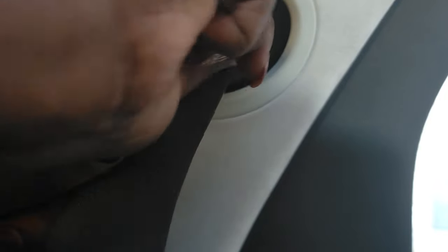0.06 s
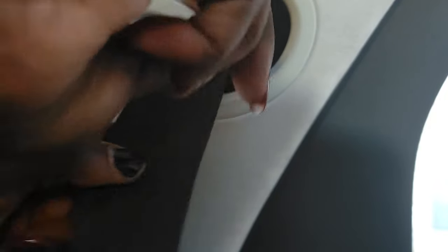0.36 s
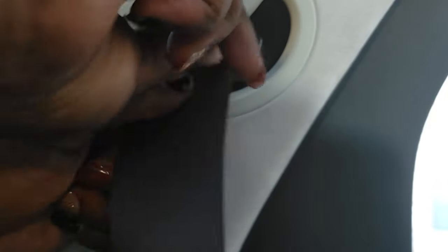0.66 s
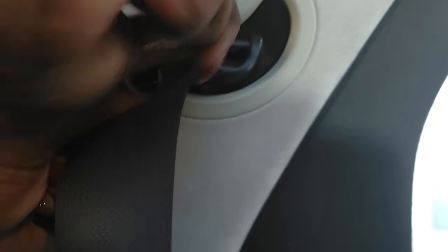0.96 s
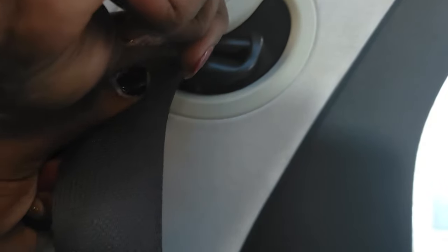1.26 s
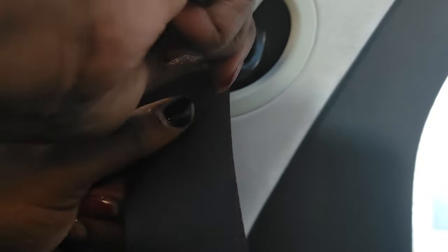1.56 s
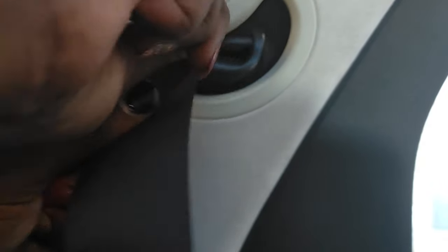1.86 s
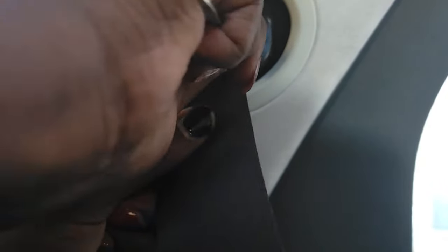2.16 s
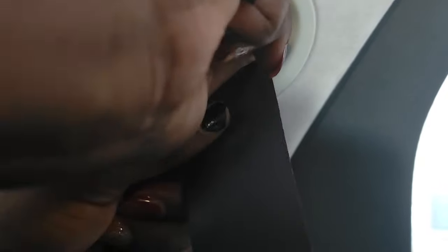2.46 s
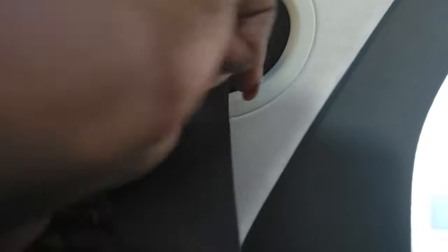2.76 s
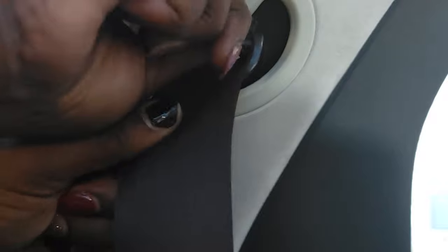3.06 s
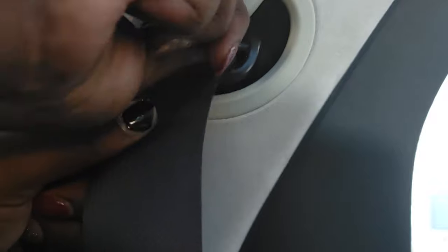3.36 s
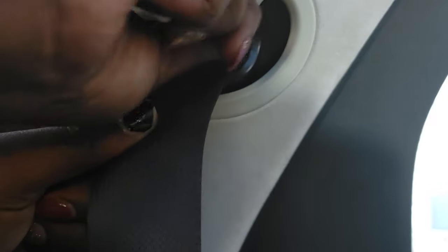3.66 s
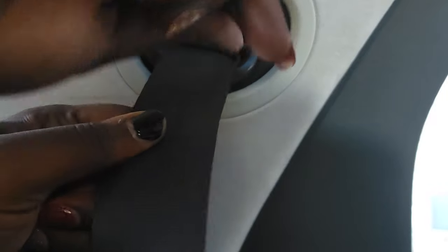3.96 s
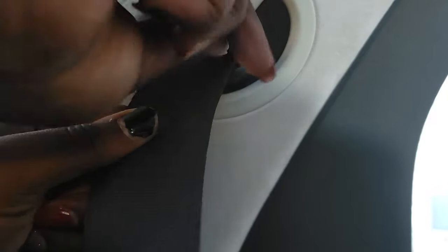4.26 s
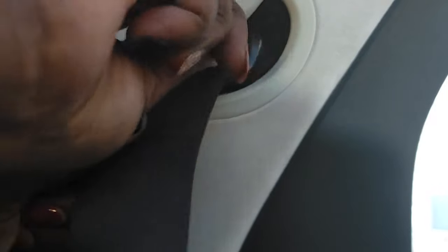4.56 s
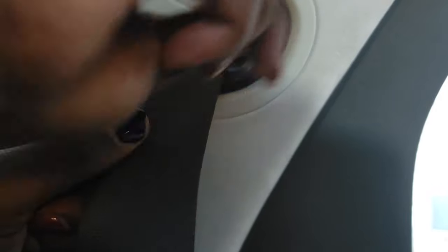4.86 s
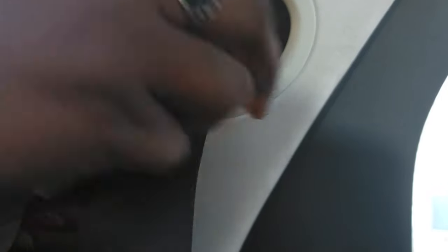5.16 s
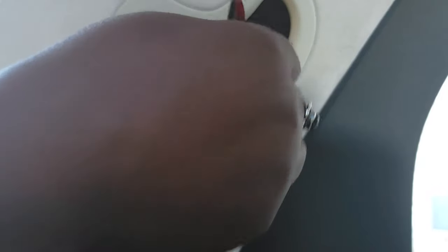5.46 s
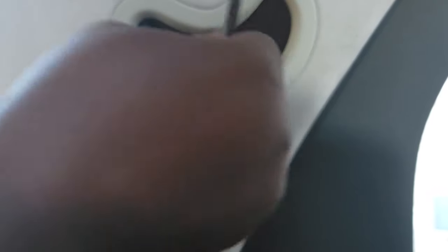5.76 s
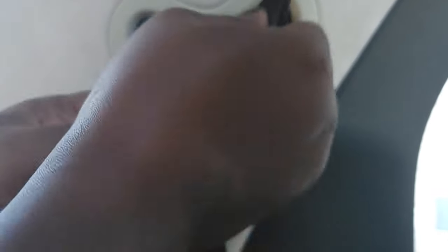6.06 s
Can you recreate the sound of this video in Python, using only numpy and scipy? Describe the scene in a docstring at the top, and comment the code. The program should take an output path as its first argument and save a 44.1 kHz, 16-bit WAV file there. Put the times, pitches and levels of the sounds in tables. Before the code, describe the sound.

Irregular clicks and hollow plastic knocks, each with a soft thump from the door pillar, sound close up as a seatbelt is tugged through its guide. The opening double knock is strongest; others follow singly or in pairs among faint finger taps and short fabric scrapes. A brief rasping clatter stands out near the end before the handling turns quiet. The car interior sounds dry and enclosed, with a faint swelling rumble.

```python
"""Seatbelt strap through its guide

Inside a small, padded car cabin, a stereo pair close to the door pillar. Hands work a twisted strap
through the plastic guide. It catches and lets go: each slip clicks on the guide, knocks the hollow trim
and thumps the pillar. In between, fingers tap and webbing and skin rub the plastic, over a faint rumble."""
import sys
import numpy as np
from scipy import signal
from scipy.fft import rfft, irfft
from scipy.io import wavfile
from scipy.ndimage import uniform_filter1d

SR = 44100
rng = np.random.default_rng(int(sys.argv[2]) if len(sys.argv) > 2 else 0)


def wav_out(sig):
    """Save sig, one row per channel (or a flat mono array), as 16-bit PCM at SR to the path in sys.argv[1]."""
    wavfile.write(sys.argv[1], SR, np.round(np.clip(np.atleast_2d(sig).T, -1, 1) * 32767).astype(np.int16))


N = 273483
T = np.arange(int(.45 * SR)) / SR  # seconds into one knock


def amp(db):
    return 10 ** (np.asarray(db) / 20)


def unit_rms(x):
    return x / np.sqrt(np.mean(x ** 2) + 1e-20)


def blow(x, db):
    """Gives x the energy of 20 ms at this level."""
    return amp(db) * x * np.sqrt(.02 * SR / np.sum(x ** 2))


def add(mix, start_s, sound):
    part = mix[:, max(round(start_s * SR), 0):][:, :sound.shape[1]]
    part += sound[:, :part.shape[1]]


def stereo_noise(size, width):
    """Noise at two microphones; width is the size of what they do not share."""
    mid, side = rng.standard_normal((2, size))
    return np.array([mid + width * side, mid - width * side]) / np.hypot(1, width)


def colour(points, size=4096):
    """Causal impulse response whose spectrum follows points of Hz and dB and falls off beyond them."""
    hz, db = np.transpose(points)
    f = abs(np.fft.fftfreq(size, 1 / SR)) + 1
    log_gain = np.log(amp(np.interp(np.log(f), np.log(hz), db)))
    log_gain -= 2 * np.maximum(np.log(f / hz[-1]), 0) + np.clip(np.log(hz[0] / f), 0, 2)
    return np.fft.ifft(np.exp(np.conj(signal.hilbert(log_gain)))).real[:size // 2]


def through(x, response):
    return signal.fftconvolve(x, np.atleast_2d(response), axes=1)[:, :x.shape[1]]


def band(x, low_hz, high_hz):
    return signal.sosfilt(signal.butter(3, [low_hz, high_hz], "band", fs=SR, output="sos"), x)


def cabin_rumble():
    """Low rumble that swells and fades, nearly the same at both microphones, under a faint steady hiss."""
    # Each row: frequency in Hz, relative level in dB.
    spectrum = [(20, -12), (60, -2), (93, 1), (182, -10), (328, -21), (542, -19), (760, -28), (1570, -35.5),
                (2600, -36), (4800, -45.5), (7100, -45.5), (9500, -64), (16000, -60.5)]
    # Each row: time in seconds, gain of the low end in dB.
    swell_points = [(0, 12), (.6, 3), (1.2, 8), (2.3, 4), (3, 10), (4.098, 4), (4.6, 8.5), (5.149, -1),
                    (6.2, 1)]
    hz, db = np.transpose(spectrum)
    f = np.fft.rfftfreq(N, 1 / SR) + 1
    gain = amp(np.interp(np.log(f), np.log(hz), db))
    mid, side = rfft(rng.standard_normal((2, N))) * gain
    side *= np.interp(f, [150, 1200], [.25, .8])
    both = np.array([mid + side, mid - side])
    low_share = 1 / (1 + (f / 900) ** 2)
    swell = amp(np.interp(np.arange(N) / SR, *np.transpose(swell_points)))
    low, high = irfft(both * low_share, N), irfft(both * (1 - low_share), N)
    return amp(-59.5) * (low * swell + high) / np.std(low + high)


def early_echoes(spread_s, strength, count=7):
    """Direct sound, then echoes off hand, window and pillar, other ones at each microphone."""
    response = np.zeros((2, len(T)))
    for side in response:
        delay = rng.uniform(.1, 1, count)
        side[(delay * spread_s * SR).astype(int)] = strength * rng.choice([-1, 1], count) * np.exp(-delay)
    response[:, 0] = 1
    return response / np.linalg.norm(response, axis=1, keepdims=True)


def friction(spectrum, grain_db, grains_per_s, grain_share):
    """Countless fibres catch and slip; a few are large enough to tick."""
    size = amp(grain_db * np.minimum(rng.exponential(1, N), 4))
    grains = stereo_noise(N, width=1) * size * (rng.random(N) < grains_per_s / SR)
    fibres = stereo_noise(N, width=1) + grain_share * unit_rms(grains)
    return unit_rms(through(fibres, colour(spectrum)))


def strap_rubs():
    """Each short pull swells and fades unevenly; a light touch fizzes, a firm one rasps."""
    # Each row: middle and length in seconds, scrape in dB, hiss of the weave in dB,
    # lightness of touch as fizz over rasp in dB.
    pulls = [(0.306, 0.029, -66, -65, -5), (0.592, 0.22, -73, -70.5, 3.5), (0.654, 0.032, -82, -57.5, -2.5),
             (0.795, 0.064, -48.5, -67.5, -2), (1.091, 0.074, -48.5, -72, 1), (1.205, 0.092, -62, -94.5, 3),
             (1.396, 0.045, -82, -77, 19), (1.548, 0.073, -64.5, -72.5, 2), (2.038, .17, -64, -65, 2.5),
             (2.436, 0.061, -51, -60, -3), (2.617, 0.088, -51.5, -63.5, -2.5),
             (2.773, 0.069, -76, -63.5, -2.5), (2.994, 0.049, -50.5, -54.5, 1.5),
             (3.436, 0.024, -44.5, -52, 0), (3.545, .088, -52, -60.5, -7),
             (3.689, 0.042, -50.5, -59.5, -2.5), (4.372, 0.032, -50, -68, 15), (4.548, 0.094, -53, -74, 4),
             (4.721, 0.05, -32.5, -43, -3), (4.789, 0.13, -48, -63, -1.5), (5.546, 0.25, -63.5, -63, -1.5),
             (5.617, 0.066, -55, -50, -7), (5.779, 0.069, -46.5, -58, 5), (5.96, 0.3, -61.5, -73.5, -1),
             (6.202, 0.13, -52.5, -67.5, -12.5)]
    # The rub's four spectra, low to high. Each row: frequency in Hz, relative level in dB.
    flutter_spectrum = [(40, -19.5), (80, -4.5), (160, 9), (300, -1), (480, -11.5), (900, -59)]
    scrape_spectrum = [(250, -29), (500, 2.5), (950, 5), (1500, -3.5), (2300, -6.5), (3200, -11),
                       (5000, -30)]
    rasp_spectrum = [(1400, -20.5), (2400, -2), (3500, -5.5), (4600, -7), (6000, -15.5)]
    fizz_spectrum = [(3800, -20), (5200, 0.5), (6200, 0.5), (7600, 2), (9500, -12), (12000, -19),
                     (14800, -7), (16500, -26)]
    middle, length, scrape_db, hiss_db, light_db = np.transpose(pulls)
    flutter_db = -46.5 + .3 * (scrape_db + 45.5)  # the strap's flutter partly follows the scrape
    rasp_db = hiss_db - 10 * np.log10(1 + amp(light_db) ** 2)
    t = np.arange(N) / SR
    coarse_t = t[::64]
    pull_power = np.exp(-(2.55 * (coarse_t - middle[:, None]) / length[:, None]) ** 2)
    flutter, scrape, rasp, fizz = (np.interp(t, coarse_t, np.sqrt(amp(db) ** 2 @ pull_power))
                                   for db in (flutter_db, scrape_db, rasp_db, rasp_db + light_db))
    grip = amp(1.9 * unit_rms(uniform_filter1d(rng.standard_normal(N), 300)))
    sound = flutter * friction(flutter_spectrum, grain_db=2.5, grains_per_s=92, grain_share=.32)
    sound += scrape * friction(scrape_spectrum, grain_db=7.5, grains_per_s=450, grain_share=.4)
    sound += rasp * friction(rasp_spectrum, grain_db=8.5, grains_per_s=320, grain_share=.48)
    sound += fizz * friction(fizz_spectrum, grain_db=7, grains_per_s=590, grain_share=.2)
    return through(grip * sound, early_echoes(spread_s=.0031, strength=.44))


def finger_taps(per_s=3):
    """The gripping fingers tap faintly at random times; gives rows like those of the slips."""
    mean_db, spread_db = -57.5, 3
    pitch_hz, weight_db, hardness_db, contact_s = 520, 5, -32.5, .0016
    count = round(per_s * N / SR)
    slot_s = N / SR / count
    return [((k + when) * slot_s, mean_db + spread_db * (2 * force - 1),
             pitch_hz, weight_db, hardness_db, contact_s)
            for k, (when, force) in enumerate(rng.random((count, 2)))]


def ring(modes, centre_hz, octaves, detune, width):
    """The place of contact favours modes near centre_hz; the hand's grip shifts each a little."""
    hz, db, t60 = np.transpose(modes)[:, :, None]
    shift, phase, split = rng.standard_normal((3, len(modes), 1))
    envelope = amp(db - 60 * T / t60) / (1 + (np.log2(hz / centre_hz) / octaves) ** 2)
    waves = envelope * np.exp(2j * np.pi * (hz * (1 + detune * shift) * T + phase))
    channels = [(waves * np.exp(1j * side * width * split)).sum(0).imag for side in (1, -1)]
    return unit_rms(np.array(channels))


def contact_noise(contact_s, tail_db, t60, width):
    """A brief, gritty rasp of contact and its dense reflections in the cabin."""
    rasp = (T / contact_s) ** .8 * np.exp(1.5 - 2 * T / contact_s)
    grit = amp(2.5 * np.interp(T, T[::16], rng.standard_normal(len(T[::16]))))
    tail = amp(tail_db - 60 * T / t60) * (1 - np.exp(-T / contact_s))
    return stereo_noise(len(T), width) * np.hypot(rasp, tail) * grit


def pillar_thump(weight_db):
    """The heavy pillar and the cabin air answer slowly; a heavier blow wakes deeper modes."""
    # Each row: mode frequency in Hz, relative level in dB, seconds to fall 60 dB.
    modes = [(72.66, -1, 0.44), (103, -5, 0.22), (156.1, -4, 0.14), (172.9, -6.5, 0.1), (241.6, 3.5, 0.075),
             (292.4, 6, 0.088), (317, -2, 0.14)]
    centre_hz = 190 * 2 ** (-weight_db / 22)
    onset = 1 - np.exp(-(T / .007) ** 2)
    body = ring(modes, centre_hz, octaves=.41, detune=.012, width=.2) * onset
    thud = band(contact_noise(.021, tail_db=-6, t60=.34, width=.55), 71, 350)
    return body + .34 * unit_rms(thud)


def trim_knock(pitch_hz, contact_s):
    """The hollow plastic trim rings, with the dull push of the contact around the same pitch."""
    # Each row: mode frequency in Hz, relative level in dB, seconds to fall 60 dB.
    modes = [(402, -1.5, 0.088), (467, -5.5, 0.075), (550, -2, 0.081), (642, -3.5, 0.052), (773, -9.5, .09),
             (917, -1.5, 0.052), (1008, -3, 0.065), (1061, -5.5, 0.081), (1202, -8, 0.047),
             (1342, -4.5, 0.069), (1414, -8, 0.15)]
    onset = 1 - np.exp(-(T / contact_s) ** 2)
    body = ring(modes, pitch_hz, octaves=.45, detune=.007, width=.75) * onset
    push = band(contact_noise(2 * contact_s, tail_db=-14, t60=.11, width=.55), .5 * pitch_hz, 1.4 * pitch_hz)
    return body + unit_rms(push) / 2


def guide_click(contact_s):
    """A midrange clack and a treble snap, each contact noise plus the guide's sharp ring."""
    # Each row: mode frequency in Hz, relative level in dB, seconds to fall 60 dB.
    modes = [(1520, 2, .055), (1650, 0, .055), (1880, -4, .04), (2225, -6, .05), (2556, -1, .055),
             (2800, -2, .045), (3535, -1, .04), (3950, -1, .03), (4570, 4, .03), (5900, -2, .05),
             (6200, -1, .03), (6840, -1, .03), (7150, 0, .03), (7800, -3, .025)]
    # Spectra of the contact noise. Each row: frequency in Hz, relative level in dB.
    clack_spectrum = [(950, -15), (1350, 3.5), (1650, 2), (2100, 3.5), (3200, -3.5), (4400, -3.5),
                      (5000, -11.5), (6200, -25)]
    snap_spectrum = [(3800, -22), (4700, -3), (6000, 0), (7400, 0), (8600, -3), (10500, -9), (12500, -10),
                     (14500, -5), (15800, -9)]
    onset = 1 - np.exp(-2 * T / contact_s)
    clack_noise = contact_noise(contact_s, tail_db=-17, t60=.1, width=.4)
    clack = unit_rms(through(clack_noise, colour(clack_spectrum)))
    clack += .5 * ring(modes, 1700, octaves=9, detune=.002, width=.083) * onset
    snap_noise = contact_noise(contact_s, tail_db=-25, t60=.08, width=.4)
    snap = unit_rms(through(snap_noise, colour(snap_spectrum)))
    snap += ring(modes, 7200, octaves=.19, detune=.003, width=.67) * onset
    return clack, snap


def slips_and_taps():
    """Each slip of the strap and each finger tap sounds the pillar, the trim and the guide."""
    # Each row: start in seconds, knock in dB, pitch of the spot struck in Hz, weight as thump over
    # knock in dB, hardness as snap over knock in dB, contact time in seconds.
    slips = [(0.0726, -15, 843, -2, -18.5, 0.0011), (0.157, -19, 850, -0.5, -11, .0011),
             (0.308, -63, 450, -1, 1.5, 0.0014), (1.4382, -23.5, 504, -12.5, -60.5, 0.0013),
             (1.731, -23, 778, 4, -28.5, 0.0011), (1.749, -22.5, 485, 2.5, -13.5, 0.00074),
             (1.92, -34, 570, -24, -46, 0.0013), (1.935, -36, 550, 4, -26.5, .0018),
             (2.193, -53, 526, -11, -50, .002), (2.425, -41, 576, -15, -38, .0018),
             (2.465, -35.5, 580, 9, -20, 0.0023), (2.631, -27, 720, 3.5, -42, .005),
             (2.785, -52.5, 398, 12, -32, 0.0019), (2.819, -53.5, 465, 10, -24.5, 0.0037),
             (2.996, -45.5, 550, 7.5, -6, .0012), (3.022, -42, 590, 2, -37, 0.003),
             (3.185, -30, 710, 4, -30.5, .002), (3.212, -28.5, 545, 5.5, -6, 0.00081),
             (3.449, -39, 430, 12.5, -22.5, 0.0029), (3.514, -23.5, 810, -2.5, -17.5, 0.0024),
             (3.809, -43.5, 446, 12, -11, 0.0026), (3.858, -52, 590, 16, -20, 0.00092),
             (4.278, -54, 442, 10, -35, .001), (4.394, -41, 575, 7, -18, 0.00092),
             (4.415, -41, 630, 9, -19, .0018), (4.495, -44.5, 686, 2, -44, .0015),
             (4.516, -25.5, 755, -2, -21.5, 0.0023), (4.7, -23, 437, -10.5, -25, 0.0025),
             (4.706, -18.5, 850, -3.5, -2, 0.0024), (4.7218, -18.5, 1130, 8, -6, 0.0034),
             (4.743, -27.5, 450, 11, -16.5, 0.0017), (4.777, -30, 680, 2.5, -18, 0.0097),
             (4.8502, -41, 514, 7.5, -4.5, 0.0017), (5.312, -40, 790, 1, -6, 0.0064),
             (5.4591, -58, 430, 18.5, 5.5, 0.0026), (5.625, -48.5, 880, -5, 2.5, 0.0032),
             (5.669, -45, 520, 7, -44, 0.0014), (5.7046, -38.5, 400, 4.5, -11.5, .0015),
             (5.749, -42, 420, 9.5, -61, .007), (5.777, -49, 566, 23, -21.5, .015),
             (5.971, -41, 460, 4, -62, .003), (6, -43.5, 616, 9.5, -48, .003),
             (6.017, -53, 510, 22.5, -40, .002), (6.043, -40.5, 750, -5, -51, 0.0011)]
    out = np.zeros((2, N))
    echoes = early_echoes(spread_s=.0035, strength=.83)
    lean_left, lean_right = amp([[1.1], [-1.2]]), amp([[-.4], [.4]])
    for start_s, knock_db, pitch_hz, weight_db, hardness_db, contact_s in slips + finger_taps():
        contact_s = max(contact_s, .0008)
        # a harder or slower contact gives more clack
        clack_db = knock_db + .61 * hardness_db + 3 * np.log2(contact_s / .0018)
        thump = blow(pillar_thump(weight_db), knock_db + weight_db)
        knock = blow(trim_knock(pitch_hz, contact_s), knock_db)
        clack, snap = guide_click(contact_s)
        clack = blow(through(clack, echoes), clack_db)
        snap = blow(through(snap, echoes), knock_db + hardness_db)
        add(out, start_s, thump + (knock + clack) * lean_left + snap * lean_right)
    return out


def scene():
    """The strap over the cabin's rumble; the right microphone hears the guide slightly later."""
    lag_samples = 9
    left, right = slips_and_taps() + strap_rubs()
    return np.array([left, np.pad(right, (lag_samples, 0))[:N]]) + cabin_rumble()


def record(dry):
    """The recorder clips at full scale and cuts the highest treble."""
    edge_hz = 16300
    low_pass = signal.firwin(255, edge_hz, window=("kaiser", 8), fs=SR)
    return signal.oaconvolve(np.clip(dry, -1, 1), low_pass[None], "same")


dry = scene()
out = record(dry)
wav_out(out)
```